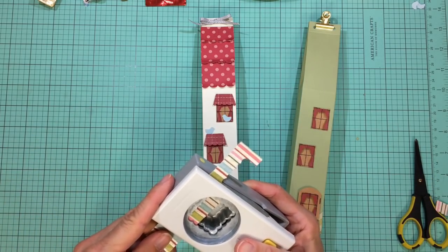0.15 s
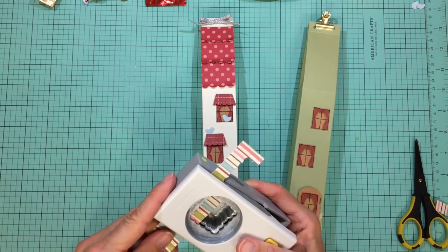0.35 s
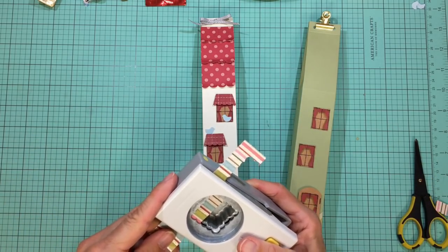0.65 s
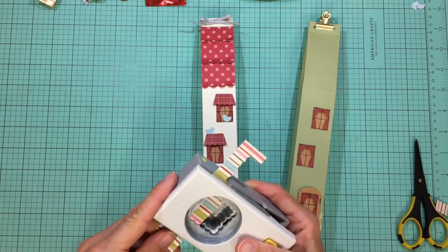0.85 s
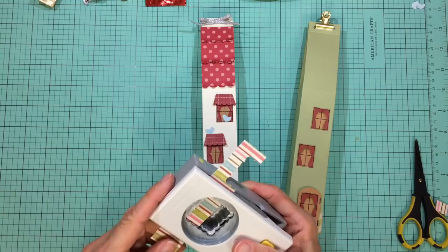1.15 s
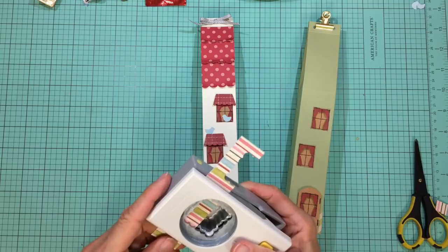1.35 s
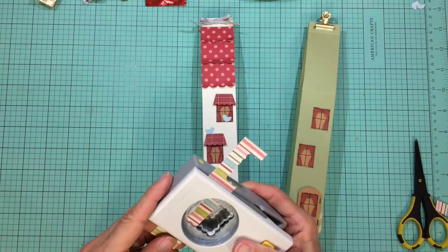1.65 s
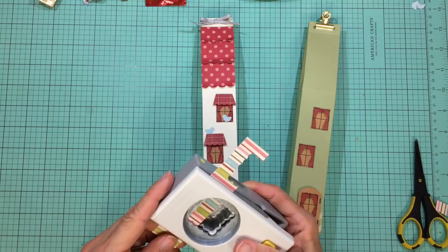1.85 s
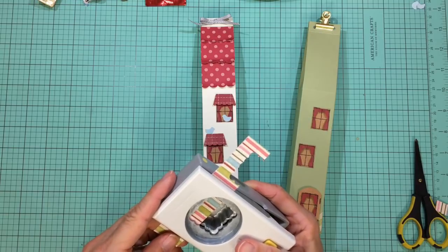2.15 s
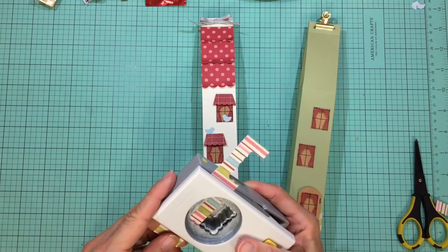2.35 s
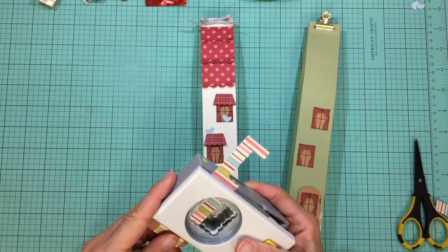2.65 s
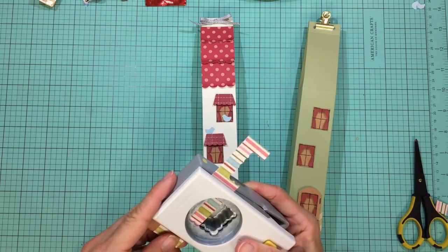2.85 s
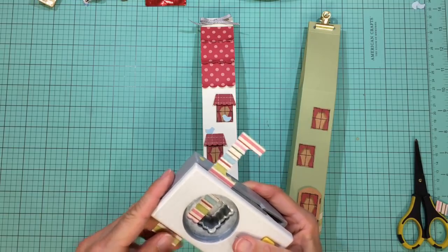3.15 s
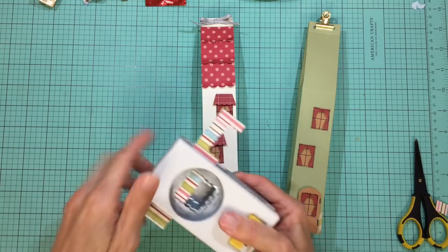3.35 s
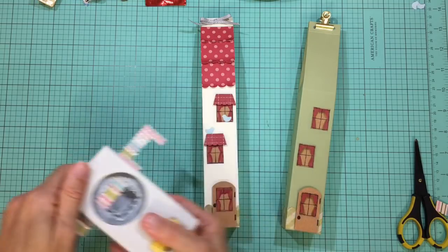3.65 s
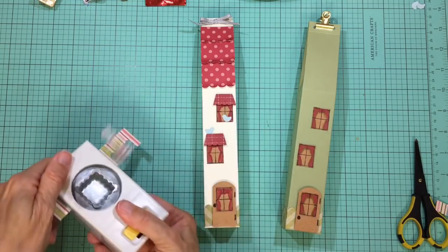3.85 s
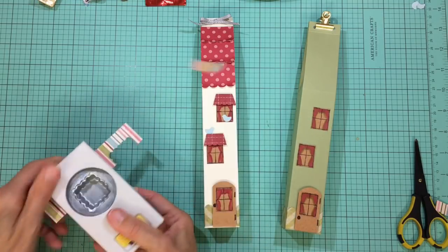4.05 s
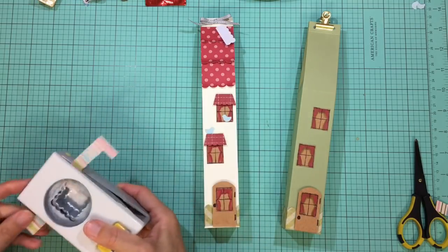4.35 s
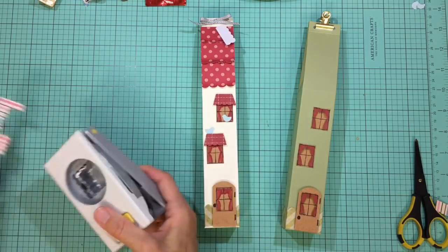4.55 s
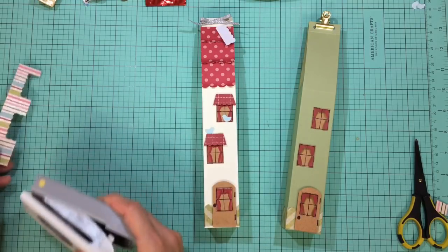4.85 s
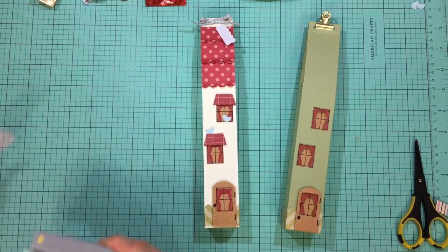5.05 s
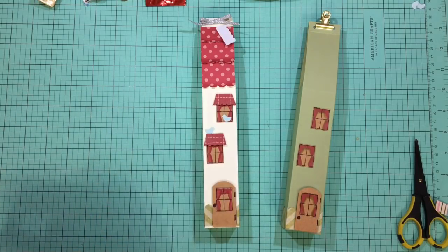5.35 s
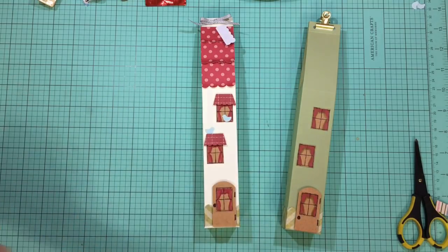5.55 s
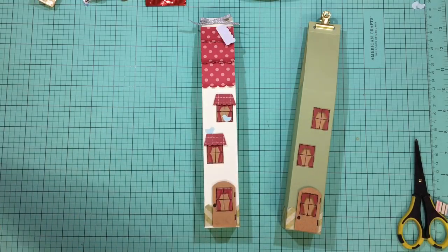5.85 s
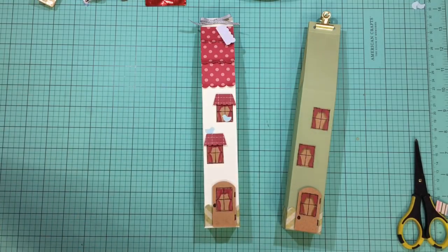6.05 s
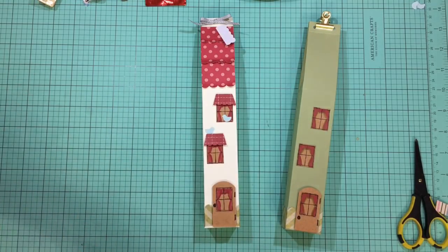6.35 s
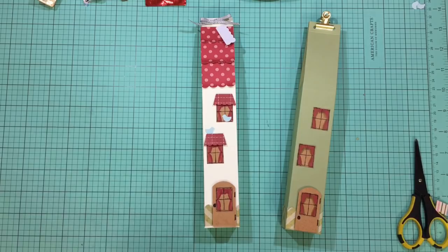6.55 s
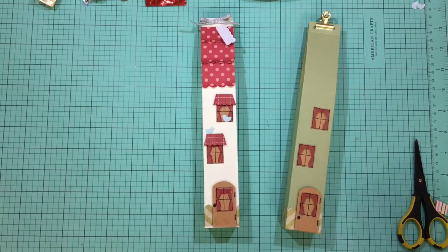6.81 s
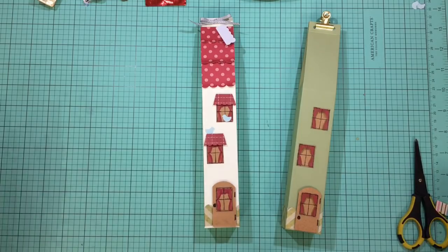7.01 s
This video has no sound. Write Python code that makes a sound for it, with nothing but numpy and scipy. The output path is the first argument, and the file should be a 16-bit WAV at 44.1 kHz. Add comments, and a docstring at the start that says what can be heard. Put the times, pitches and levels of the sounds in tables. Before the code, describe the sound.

Close by, card scrapes in a handheld punch that crunches, snaps and clacks, before knocking down onto a tabletop in a quiet room.

```python
"""In a quiet room, with an appliance humming faintly, a strip of card slides into a craft punch close by.
The steel die (the cutter) crunches through in short bursts that ring the hollow shell, then breaks
through with a snap, and the lever springs back with a clack. The strip rubs its way out and is dropped.
The punch is set down and rocks to rest, making the table top boom and shudder."""
import sys
import numpy as np
from scipy import signal
from scipy.fft import rfft, irfft
from scipy.io import wavfile

SR = 44100
rng = np.random.default_rng(int(sys.argv[2]) if len(sys.argv) > 2 else 0)


def waveform_to_disk(signal):
    """Save audio, clipped to [-1, 1], as 16-bit WAV at the path in sys.argv[1]."""
    frames = np.transpose(np.atleast_2d(signal))
    scaled = np.clip(frames, -1, 1) * 32767
    samples = np.round(scaled).astype(np.int16)
    wavfile.write(sys.argv[1], SR, samples)


N = 316505

# tone of the room's steady noise: (frequency [Hz], relative level [dB])
AIR_SPECTRUM = [(12, -56.5), (20, -41.5), (36, -15), (60, 0), (81, -12), (116, -1), (154, -12.5),
                (241, -13), (399, -23), (513, -26), (1120, -29.5), (1290, -28), (1400, -30.5),
                (2820, -33.5), (16000, -42)]
# an appliance's low hum: (pitch [Hz], width [Hz], level [dB])
HUM_BANDS = [(57.05, 5, -68.5), (127.6, 7.1, -74.5), (245.3, 18, -79)]
# an appliance's thin whine: (pitch [Hz], level [dB])
WHINE_TONES = [(1247.5, -81), (1307, -81)]
# echoes from nearby surfaces: (delay [s], level [dB])
ECHOES = [(.0021, -30), (.0085, -17.5), (0.015, -24), (0.0236, -29)]
# how long the room rings: (frequency [Hz], time to fade by 60 dB [s])
ROOM_DECAY = [(100, 0.67), (300, 0.38), (1000, 0.25), (4000, 0.23), (9000, 0.21), (16000, 0.24)]
# the room's ring grows as the hands move aside: (time [s], relative level [dB])
ROOM_SHARE = [(0, -12), (3.9, -13.5), (4.5, -13.5), (4.77, -3.5), (5.601, -4.5), (6.0, -8), (6.33, -10),
              (7.1, 1)]
# how far the hands are off to the side: (time [s], amount [0-1])
HANDS_ASIDE = [(3.9, 0.5), (4.4, 0), (4.75, 1), (5.6, 0.4), (5.8, 0), (6.3, 0.83)]

# Modes are the notes a part rings at; wider ones fade sooner: (pitch [Hz], width [Hz], level [dB])
TABLE_MODES = [(107.5, 4.5, 4.5), (145, 20, -7), (177, 10, 2), (205, 30, -9), (240, 24, -1.5),
               (280, 34, -8), (344, 11, -7), (441, 18, 1.5), (678, 26, -7)]
CASE_MODES = [(679, 62, -2.5), (839, 72, -10), (1023, 140, -5), (1237, 274, -5), (1586, 90, -3),
              (1650, 35, -4), (2140, 360, -1), (2620, 130, -13), (3260, 250, 1), (4350, 120, -8.5),
              (5830, 750, -1.5), (7860, 4800, -7)]
SHELL_MODES = [(1328, 108, -3.5), (1320, 210, -13.5), (1950, 88, -18), (623, 300, -34)]
DIE_MODES = [(3270, 320, -4.5), (3530, 380, -2), (3930, 300, -5.5), (4000, 220, -15.5), (4756, 500, -13),
             (6510, 1700, -17.5)]
# tones of card rubbing in the slot, rustling, hissing, cracking: (frequency [Hz], relative level [dB])
SLOT_SPECTRUM = [(400, -36.5), (1100, -12.5), (1450, 4.5), (2050, 3), (2500, -13), (4700, -18),
                 (5600, -15.5), (6500, -26), (12000, -37.5)]
RUSTLE_SPECTRUM = [(100, -14), (600, -4.5), (1100, 9), (2400, -1), (2900, -4), (3500, 2), (4500, -7),
                   (6000, -8.5), (10000, -13), (16000, -22.5)]
HISS_SPECTRUM = [(500, -11), (3000, 0.5), (6000, 3), (9000, 1.5), (10400, -2.5), (12500, -2),
                 (16000, -12.5)]
CRACK_SPECTRUM = [(60, -1.5), (400, 2), (1000, -12), (2500, -4), (5500, -12.5), (8500, -3), (10500, -12),
                  (14000, -7.5), (16500, -18.5)]

# ways of rubbing, by kind: (part of the stroke spent speeding up [0-1], slot [dB], rustle [dB], hiss [dB])
RUB_KINDS = {"slot": (0.72, 0.5, -24, -11.5), "brush": (0.85, -9, -11.5, -0.5),
             "grip": (0.93, -14, 1, -19.5), "sweep": (0.18, -18.5, -13, 0.5)}
# single strokes of card and fingers: (start [s], length [s], strength [dB], kind)
STROKES = [(0.488, 0.073, -73, "grip"), (0.875, .13, -50, "slot"), (0.935, 0.025, -49, "slot"),
           (1.087, 0.17, -62.5, "brush"), (1.298, .11, -51.5, "slot"), (1.46, 0.097, -71, "slot"),
           (1.908, 0.1, -65, "grip"), (2.915, 0.092, -68.5, "grip"), (3.177, 0.066, -60.5, "brush"),
           (4.431, 0.028, -54, "slot"), (4.477, 0.051, -49, "slot"), (4.807, 0.26, -62.5, "grip"),
           (4.85, 0.0395, -48, "grip"), (4.856, 0.0246, -43, "brush"), (4.944, 0.27, -73.5, "brush"),
           (5.371, 0.057, -59.5, "brush"), (5.432, 0.11, -65, "brush"), (5.747, .3, -58, "sweep"),
           (6.153, 0.63, -70.5, "grip"), (6.934, 0.064, -68.5, "grip")]
# the strip drags during the cut, then is tugged out: (time [s], friction [dB])
STRIP_DRAG = [(3.42, -79), (3.532, -67), (3.75, -61.5), (4.043, -65.5), (4.057, -53.5), (4.15, -60),
              (4.34, -64), (4.45, -54.5), (4.478, -70.5), (4.492, -48), (4.55, -48), (4.58, -78),
              (4.68, -88)]
# pushes into the table top: (time [s], strength [dB], hardness [Hz], damping by the hand [factor])
TABLE_THUMPS = [(4.268, 21.5, 58.7, 0.55), (5.541, 2, 1200, 2.3), (5.8846, 34.5, 170, 0.83),
                (5.977, 29.5, 900, 2.4), (6.092, 11, 330, 2.2), (6.310, 21.5, 505, 1.9),
                (6.326, 17.5, 700, 1.5)]
# blows on the plastic case: (time [s], strength [dB], hardness [Hz])
CASE_KNOCKS = [(4.1669, 7.5, 1800), (4.171, 7.5, 1600), (4.908, -8.5, 1500), (5.5415, 17.5, 220),
               (5.565, 11.5, 240), (5.880, 15.5, 385), (5.9725, 8, 1200), (5.979, 26, 260),
               (6.0193, 11.5, 900), (6.029, 11, 720), (6.071, 4.5, 783), (6.153, -11, 2000),
               (6.307, 0, 1400), (6.3247, -1, 5500), (6.3264, 17.5, 2420), (6.665, -16.5, 1000)]
# how each kind of click is shared out: (shell [dB], die [dB], crack [dB])
CLICK_KINDS = {"steel": (-11, 0, -17.5), "plastic": (0, -33, -24.5), "card": (5.2, -6, 0),
               "tick": (-15, 0.65, 0), "breakthrough": (8.1, 0, -6.5)}
# sharp clicks: (time [s], strength [dB], kind)
CLICKS = [(0.9604, -14, "plastic"), (.978, -10, "plastic"), (1.338, -27, "tick"), (2.3102, -23, "tick"),
          (2.389, -39.5, "tick"), (3.291, -16, "card"), (3.8, 4, "steel"), (3.8028, -4, "steel"),
          (3.8652, 8, "breakthrough"), (4.1155, -28, "card"), (4.237, -18, "card"), (4.2407, 3, "plastic"),
          (4.2605, -17.5, "tick"), (4.268, -19.5, "card"), (4.2922, -29, "card"), (4.316, -29, "card"),
          (4.769, -4, "steel"), (4.776, 2, "steel"), (4.7866, -4, "steel"), (4.854, -9.5, "card"),
          (4.864, -9, "card"), (5.0716, -20, "card")]
# the die breaking through: (time [s], peak [dB], pitch [Hz], half-width [s])
SNAP_PULSES = [(3.8647, -10, 7400, .00017), (3.8650, -2.5, 3700, .00023)]
# bursts of fibres giving way under the die: (start [s], length [s], strength [dB])
FIBRE_BURSTS = [(3.4890, 0.0058, -21.5), (3.494, 0.0051, -8.5), (3.501, 0.0049, -15), (3.578, 0.0069, -5),
                (3.685, 0.0081, -5.5), (3.729, .011, -3), (3.746, .016, -6.5), (3.8, .004, -4),
                (3.83, .014, -15.5)]


def gain_of(db):
    """Turns decibels into a number to multiply by."""
    return 10 ** (np.asarray(db) / 20)


def evened(x):
    """Scales a signal to an average power of one."""
    return x / np.sqrt(np.mean(x ** 2) + 1e-20)


def unit_energy(x):
    """Scales a signal to a total energy of one."""
    return x / np.linalg.norm(x)


def look_up(points, hz):
    """Reads between a table's rows along a logarithmic frequency scale."""
    row_hz, value = np.transpose(points)
    return np.interp(np.log(hz + 1), np.log(row_hz + 1), value)


def add(mix, start_s, sound):
    """Mixes a sound in at the given time."""
    part = mix[round(start_s * SR):][:len(sound)]
    part += sound[:len(part)]


def through(x, response):
    """Plays x through something, given its response to a single tap."""
    return signal.fftconvolve(x, response)[:N]


def high_pass(x, hz, order):
    """Cuts the bass below hz; a higher order cuts more steeply."""
    return signal.sosfilt(signal.butter(order, hz, "high", fs=SR, output="sos"), x)


def colour(spectrum, size=2048):
    """The response to a tap of a filter with the given tone."""
    log_gain = np.log(gain_of(look_up(spectrum, abs(np.fft.fftfreq(size, 1 / SR)))))
    with_phase = np.exp(np.conj(signal.hilbert(log_gain)))  # nothing sounds before the tap
    return np.fft.ifft(with_phase).real[:size // 2]


def ring(modes):
    """A tapped object rings with one fading tone for each mode."""
    t = np.arange(SR) / SR
    return sum(gain_of(db) * 2 * np.pi * width / SR * np.exp(-np.pi * width * t)
               * np.cos(2 * np.pi * hz * t) for hz, width, db in modes)


def grains(count, per_s, spread_db):
    """Tiny taps at random times; more spread makes a few much larger than the rest."""
    size = gain_of(spread_db * np.minimum(rng.exponential(1, count), 4))
    return size * rng.choice([-1, 1], count) * (rng.random(count) < per_s / SR)


def wander(rate_hz):
    """A smooth random curve, about one unit in size."""
    hz = np.fft.rfftfreq(N, 1 / SR)
    return evened(irfft(rfft(rng.standard_normal(N)) / (1 + (hz / rate_hz) ** 4), N))


def swell(start_s, length_s):
    """One smooth rise and fall."""
    return np.sin(np.pi * np.clip((np.arange(N) / SR - start_s) / length_s, 0, 1)) ** 2


def push(db, hardness_hz):
    """A pulse of force: the softer the contact, the longer and duller it is."""
    t = np.arange(SR // 20) / SR
    pulse = t * np.exp(-2 * np.pi * hardness_hz * t)
    return gain_of(db) * pulse / pulse.sum()


def rattle(level_db, fade_s):
    """One tap, then a short, dense rattle of loose parts."""
    t = np.arange(SR // 8) / SR
    response = gain_of(level_db) * unit_energy(rng.standard_normal(len(t)) * gain_of(-60 * t / fade_s))
    response[0] = 1
    return response


def room_air(level_db=-63.5):
    """The room's low rumble and soft hiss."""
    tone = gain_of(look_up(AIR_SPECTRUM, np.fft.rfftfreq(N, 1 / SR)))
    return gain_of(level_db) * evened(irfft(rfft(rng.standard_normal(N)) * tone, N))


def appliance_hum():
    """Narrow bands of noise make a low, wavering hum."""
    hz = np.fft.rfftfreq(N, 1 / SR)
    noise = rfft(rng.standard_normal(N))
    return sum(gain_of(db) * evened(irfft(noise / (1 + (2 * (hz - pitch) / width) ** 2), N))
               for pitch, width, db in HUM_BANDS)


def appliance_whine(waver_hz=1.9):
    """Two thin tones whose pitch wavers slightly."""
    whine = np.zeros(N)
    for hz, db in WHINE_TONES:
        pitch = hz + waver_hz * wander(rate_hz=9)
        whine += gain_of(db) * evened(np.sin(2 * np.pi * np.cumsum(pitch) / SR))
    return whine


def echo_tail(fade_in_s=0.0054):
    """Countless echoes blur into fading noise; the bass lasts longest."""
    hz, t, noise = signal.stft(rng.standard_normal(SR), SR, nperseg=256)
    fade = gain_of(-60 * t / look_up(ROOM_DECAY, hz)[:, None])
    tail = signal.istft(noise * fade, SR, nperseg=256)[1]
    return unit_energy(tail * np.clip(np.arange(len(tail)) / SR / fade_in_s, 0, 1))


def room_echoes(x, tail_count=3, blend_hz=1.7):
    """Adds near echoes, then a blend of tails that keeps shifting, as it does when hands move."""
    early, t = np.zeros(SR // 10), np.arange(N) / SR
    for delay, db in ECHOES:
        add(early, delay, gain_of([db]))
    sent = high_pass(x, hz=207, order=1) * gain_of(np.interp(t, *np.transpose(ROOM_SHARE)))
    turn = 2 * np.pi * blend_hz * t
    tails = sum(through(sent * np.cos(turn + np.pi * k / tail_count), echo_tail())
                for k in range(tail_count))
    return x + through(x, early) + tails * np.sqrt(2 / tail_count)


def dulled_from_side(x, cutoff_hz=7420):
    """Sounds from the side arrive with less treble."""
    aside = np.interp(np.arange(N) / SR, *np.transpose(HANDS_ASIDE))
    dull = irfft(rfft(x) / (1 + (np.fft.rfftfreq(N, 1 / SR) / cutoff_hz) ** 4) ** .5, N)
    return x + aside * (dull - x)


def rubbing_strength(drag_db, usual_db=-60):
    """How strongly the long drag and the short strokes drive the slot, rustle and hiss over time."""
    strength = gain_of([-9, -1.5, -1.5])[:, None] * gain_of(drag_db)  # slot, rustle, hiss
    strength[2] *= gain_of(drag_db - usual_db) ** 0.23  # a faster pull hisses more
    for start, length, db, kind in STROKES:
        rise, *mix_db = RUB_KINDS[kind]
        progress = np.linspace(0, 1, round(length * SR))
        speed = np.sin(np.pi / 2 * np.interp(progress, [0, rise, 1], [0, 1, 0]))
        for layer, share_db in zip(strength, mix_db):
            add(layer, start, gain_of(db + share_db) * speed ** 1.6)
    return strength


def card_slides():
    """Card sticks and slips: tiny catches ring the slot, rustle and hiss, and stray fibres tick."""
    drag_db = np.interp(np.arange(N) / SR, *np.transpose(STRIP_DRAG), left=-np.inf, right=-np.inf)
    slot, rustle, hiss = rubbing_strength(drag_db)
    slips = wander(rate_hz=44)
    catches = grains(N, per_s=4000, spread_db=2.5) * gain_of(2 * slips)
    brushing = grains(N, per_s=59000, spread_db=1.0) * gain_of(slips)
    ticks = grains(N, per_s=160, spread_db=3.5)
    layers = [(slot, catches, SLOT_SPECTRUM), (rustle, catches, RUSTLE_SPECTRUM),
              (hiss, brushing, HISS_SPECTRUM), (gain_of(drag_db - 5), ticks, CRACK_SPECTRUM)]
    return sum(strength * evened(through(friction, colour(tone))) for strength, friction, tone in layers)


def table_ring(damping):
    """The table top's ring; more damping makes it die sooner."""
    return ring([(hz, width * damping, db) for hz, width, db in TABLE_MODES])


def base_chatter(level_db=-50.5):
    """Many tiny, soft contacts keep the table top rumbling while the punch settles."""
    contacts = through(grains(N, per_s=340, spread_db=0), push(0, hardness_hz=170))
    rumble = evened(through(contacts, table_ring(damping=2.5)))
    return gain_of(level_db) * swell(start_s=6.35, length_s=.5) * rumble


def rocking(count=5, start_s=6.394, first_gap_s=.086, gap_ratio=.82, damping=2.6):
    """More table thumps as the punch rocks to rest, each sooner and softer than the one before."""
    k = np.arange(count)
    times = start_s + first_gap_s * (1 - gap_ratio ** k) / (1 - gap_ratio)
    strength_db = 21 - 3 * k
    hardness_hz = 296 * 0.83 ** k
    return list(zip(times, strength_db, hardness_hz, np.full(count, damping)))


def table_thumps():
    """The table top booms under the weight, then shudders; a leaning hand shortens its ring."""
    boom, t = np.zeros(N), np.arange(N) / SR
    for start, db, hardness_hz, damping in TABLE_THUMPS + rocking():
        boom *= np.interp(t - start, [0, .025], [1, .45])  # each new contact chokes what still rings
        blow = signal.fftconvolve(push(db, hardness_hz), rattle(level_db=-14, fade_s=.13))
        add(boom, start, signal.fftconvolve(blow, table_ring(damping) / damping))
    return high_pass(boom, hz=80, order=4)


def case_knocks():
    """The plastic case clacks as the lever returns and as it lands; soft blows are dull and rattle more."""
    force = np.zeros(N)
    for start, db, hardness_hz in CASE_KNOCKS:
        octaves_harder = max(np.log2(hardness_hz / 750), 0)
        loose_parts = rattle(level_db=5.5 - 6.5 * octaves_harder, fade_s=0.059)
        blow = signal.fftconvolve(push(db, hardness_hz), loose_parts)
        cushion = np.exp(-2 * np.pi * 14.3 * hardness_hz / SR)  # softens the top of the treble
        add(force, start, signal.lfilter([1 - cushion], [1, -cushion], blow))
    return through(high_pass(force, hz=745, order=3), ring(CASE_MODES))


def punch_body(shell_force, die_force, crack_force):
    """The hollow shell and steel die ring, and the card cracks. Such small parts give off little bass."""
    shell = through(shell_force, ring(SHELL_MODES))
    die = high_pass(through(die_force, ring(DIE_MODES)), hz=1512, order=1)
    crack = through(crack_force, colour(CRACK_SPECTRUM))
    return high_pass(shell + die + crack, hz=640, order=2)


def punch_clicks():
    """Single sharp releases, each with a brief rattle of the mechanism."""
    forces = np.zeros((3, N))
    for start, db, kind in CLICKS:
        hit = rattle(level_db=-1, fade_s=.03)
        for force, share_db in zip(forces, CLICK_KINDS[kind]):
            add(force, start, gain_of(db + share_db) * hit)
    return punch_body(*forces)


def shell_creak(level_db=-50):
    """Under full pressure, tiny slips of the die keep the hollow shell ringing."""
    slips = grains(N, per_s=1500, spread_db=1.5)
    creak = evened(through(slips, ring(SHELL_MODES)))
    return gain_of(level_db) * swell(start_s=3.635, length_s=.175) * creak


def breakthrough_snap():
    """The last fibres part at once: one hard crack, only a few waves long."""
    snap, t = np.zeros(N), np.arange(-SR // 1000, SR // 1000) / SR
    for time, db, hz, width in SNAP_PULSES:
        pulse = np.exp(-(t / width) ** 2) * np.cos(2 * np.pi * hz * t)
        add(snap, time + t[0], gain_of(db) * pulse)
    return snap


def card_crunches(first_bite_db=18, bite_fade_s=0.03):
    """Each burst of tearing fibres lets the die jump and kick the shell, extra hard at the first bite."""
    kicks, tearing = np.zeros((2, N))
    t = np.arange(SR // 16) / SR
    for start, length, db in FIBRE_BURSTS:
        age = 4 * t / length
        snaps = unit_energy(grains(len(t), per_s=11000, spread_db=0.5) * age ** 2 * np.exp(-age))
        kick_db = db + first_bite_db * np.exp(-(start - FIBRE_BURSTS[0][0]) / bite_fade_s)
        add(tearing, start, gain_of(db) * snaps)
        add(kicks, start, gain_of(kick_db) * snaps)
        add(kicks, start + length / 4, push(kick_db + 17, hardness_hz=1716))
    return punch_body(kicks, die_force=gain_of(-0.5) * tearing, crack_force=gain_of(-1) * tearing)


def scene():
    """The punch, table and card sound in the room, over its steady background."""
    cut = card_crunches() + shell_creak() + breakthrough_snap()
    handling = punch_clicks() + case_knocks() + table_thumps() + base_chatter() + card_slides()
    in_room = room_echoes(dulled_from_side(cut + handling))
    return (in_room + room_air() + appliance_hum() + appliance_whine())[None]


def record(dry, cutoff_hz=16000):
    """Removes the very highest treble."""
    low_pass = signal.firwin(255, cutoff_hz, window=("kaiser", 8), fs=SR)
    return signal.oaconvolve(dry, low_pass[None], "same")


dry = scene()
out = record(dry)
waveform_to_disk(out)
```